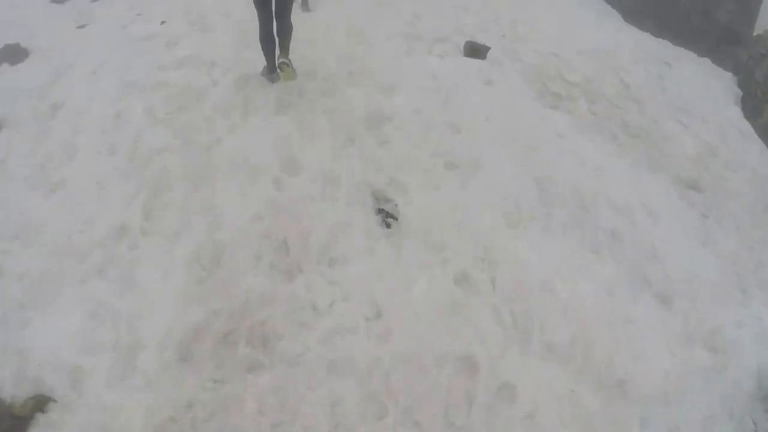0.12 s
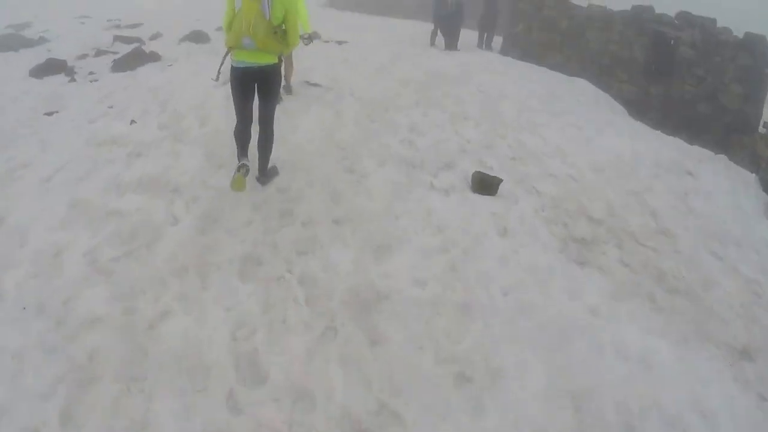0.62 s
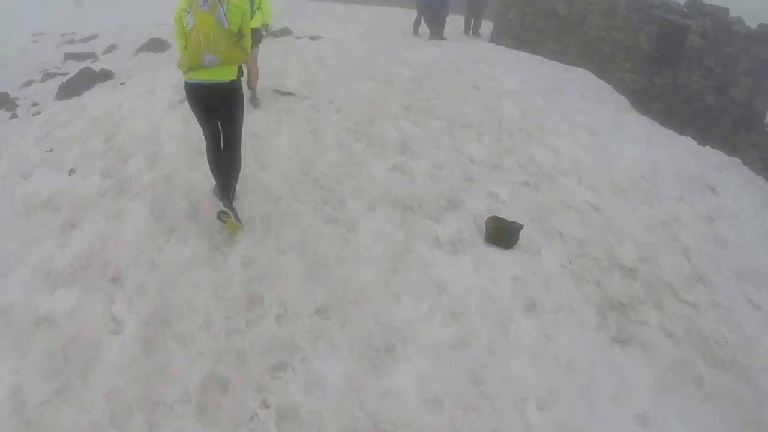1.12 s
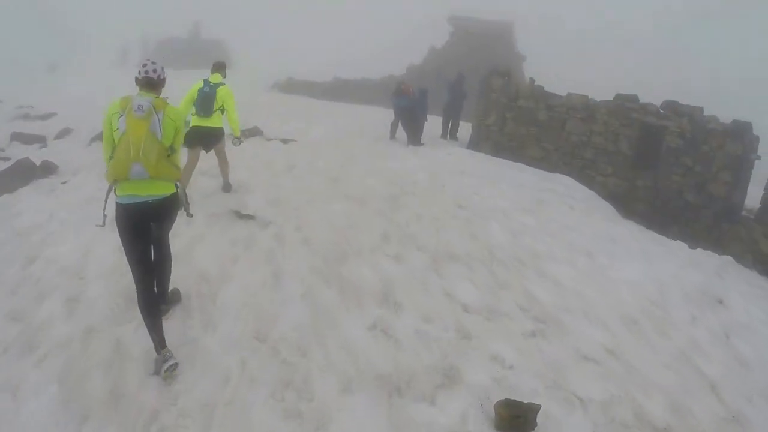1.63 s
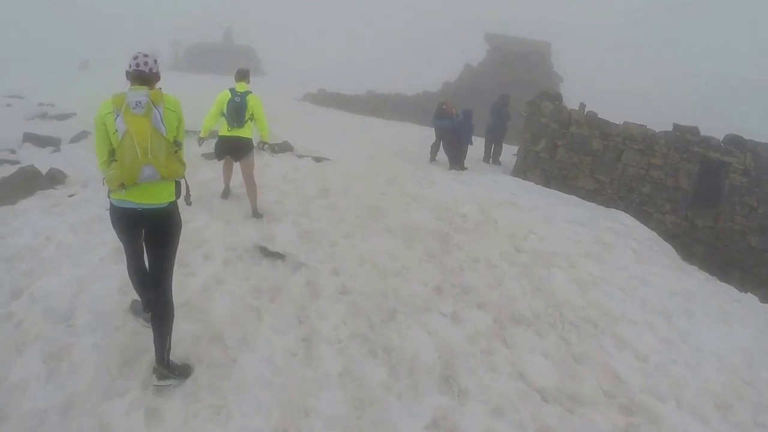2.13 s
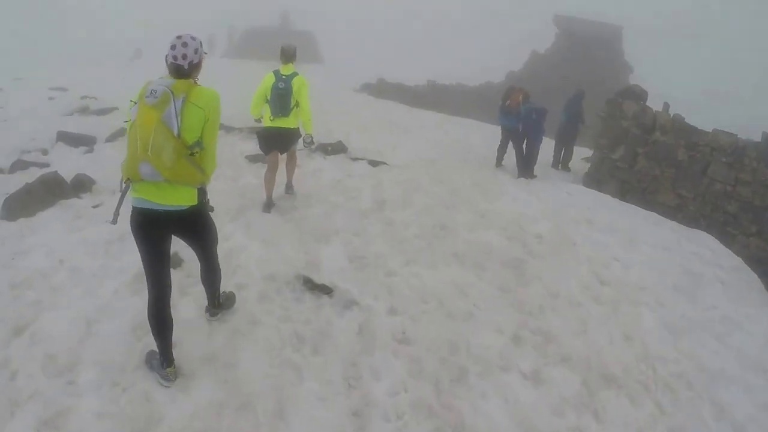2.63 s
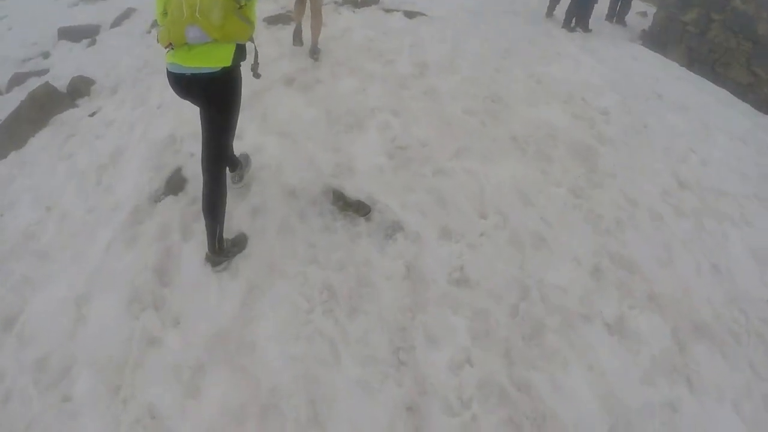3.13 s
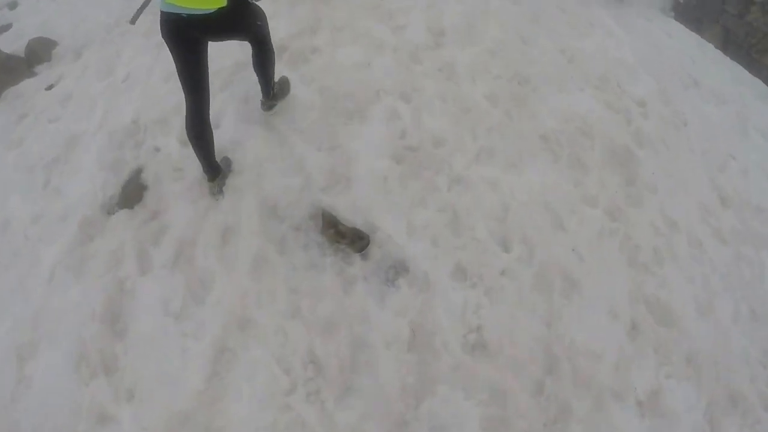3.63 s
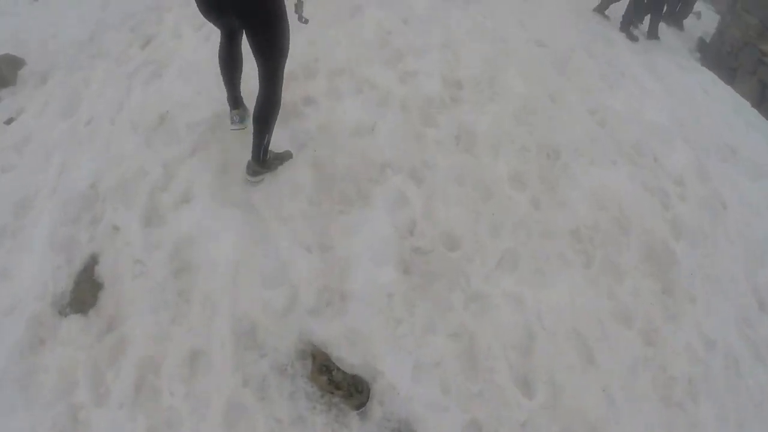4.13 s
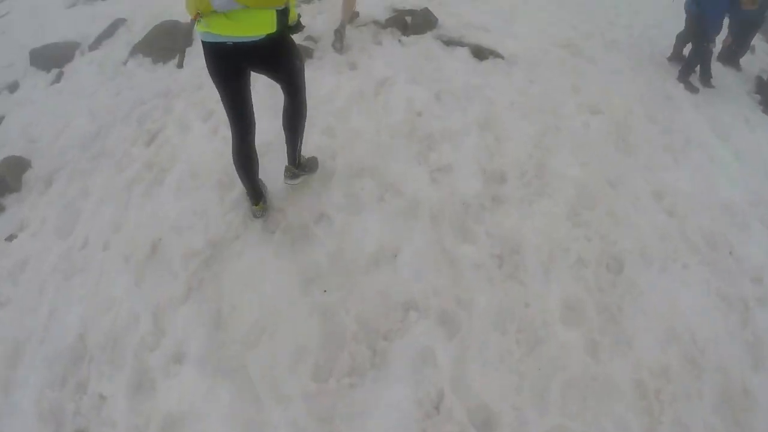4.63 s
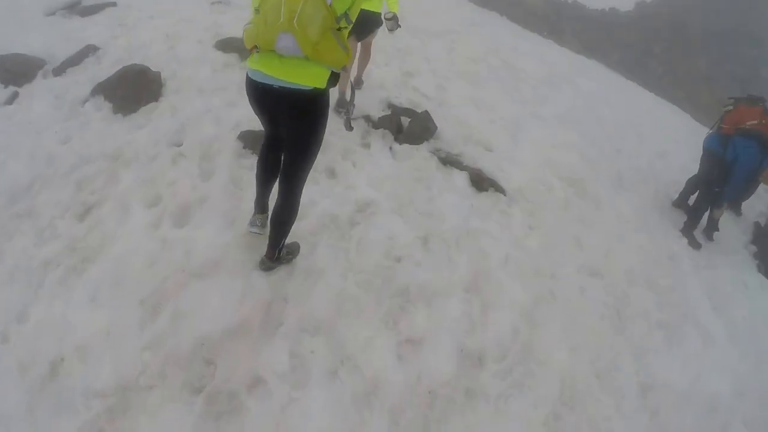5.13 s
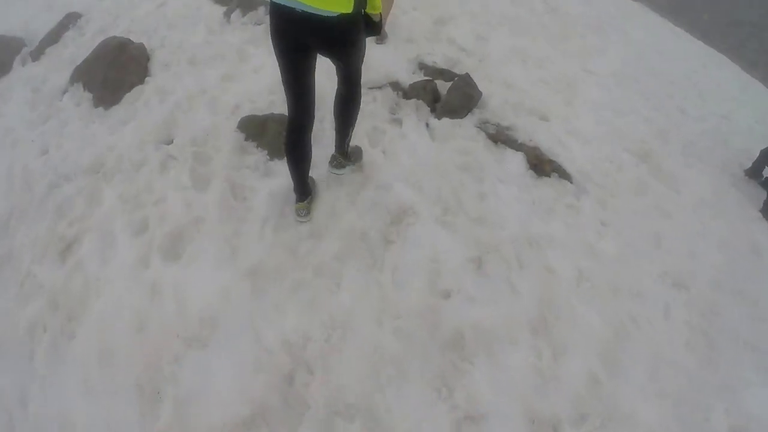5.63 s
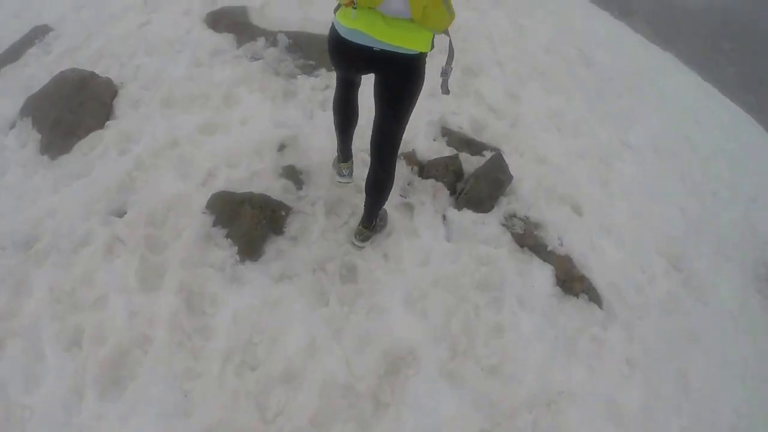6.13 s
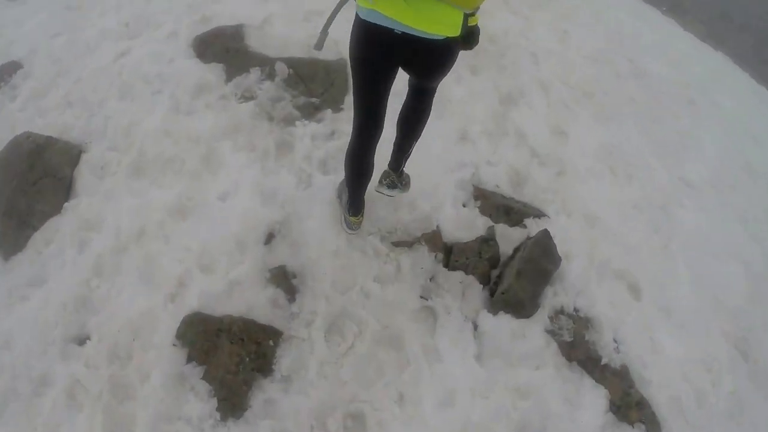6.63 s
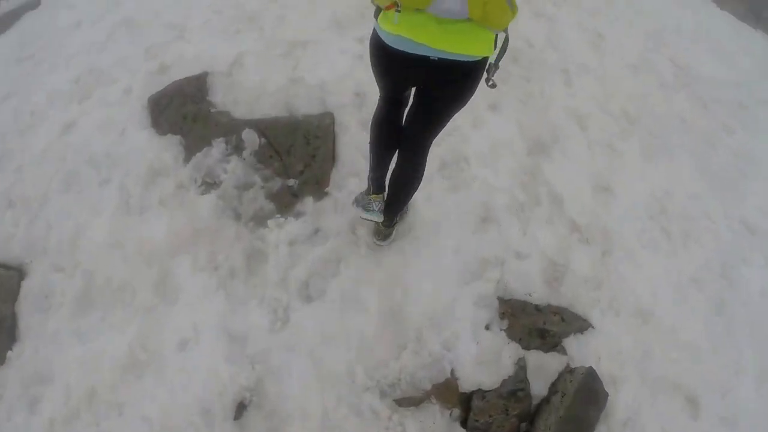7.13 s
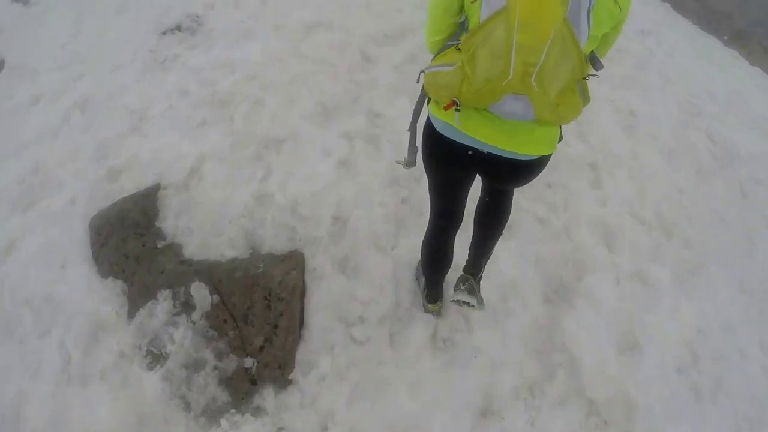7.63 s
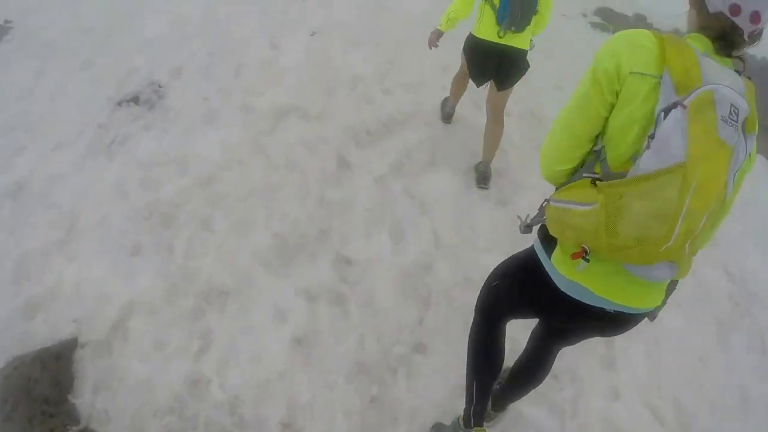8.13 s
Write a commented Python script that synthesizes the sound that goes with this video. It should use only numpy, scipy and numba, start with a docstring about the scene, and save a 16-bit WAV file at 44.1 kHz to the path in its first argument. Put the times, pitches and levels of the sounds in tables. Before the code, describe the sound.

Steady footsteps pack wet snow, each jolting the camera mount with a low thump, while straps and buckles click above constant soft hiss.

```python
"""Deep dull thuds and muffled crunches: a walker climbs a wet snowfield with a small camera on the body.
Each footfall shakes the mount, made as low noise pushed by jolts, and packs the snow, made as a
dense stream of tiny grains. Sharp ticks come from buckles, straps and cracking snow crust; a zip pull
chinks, a sole scuffs and air murmurs. The closed housing's cavities, made as resonances, color the
crunch and ticks, over steady hiss."""
import sys
import numpy as np
from scipy import signal
from scipy.fft import rfft, irfft, next_fast_len
from scipy.io import wavfile
from scipy.ndimage import uniform_filter1d
from numba import njit

SR = 44100
rng = np.random.default_rng(int(sys.argv[2]) if len(sys.argv) > 2 else 0)


def linear_from_db(decibels):
    """Turn decibels (scalar or array-like) into linear amplitude factors; 0 gives 1."""
    return 10 ** (np.asarray(decibels, float) / 20)


def master_out(mix):
    """Clip the mix to full scale and print it as 16-bit PCM to the path in sys.argv[1]."""
    frames = np.transpose(np.atleast_2d(mix))
    ceiling = np.clip(frames, -1, 1)
    pcm = np.round(ceiling * 32767).astype(np.int16)
    wavfile.write(sys.argv[1], SR, pcm)


N = 364266
T = np.arange(N) / SR  # time of every sample, in seconds

# Cavities of the housing, lower and higher ones; the lower ones color the coarse grains, the higher the fine.
# Each row: pitch in Hz, nominal width in Hz, relative level in dB.
COARSE_CAVITIES = [(1607, 490, 7), (2334, 760, 9.5), (2700, 850, 5), (3480, 790, 3)]
FINE_CAVITIES = [(4543, 890, 5.5), (5666, 680, 2), (6600, 1830, -2), (8900, 4100, -12), (10680, 2460, -8.5),
                 (13060, 1470, -11), (14850, 390, -15)]


def level(x, db):
    """Scale a sound to an rms level in dB."""
    return x * linear_from_db(db) / np.sqrt(np.mean(x ** 2))


def walk(rate):
    """Random levels, spread near 1: a new one every 1 / rate seconds, joined by straight slopes."""
    hold = int(SR / rate)
    steps = np.repeat(rng.standard_normal(N // hold + 1), hold)
    return 0.92 * uniform_filter1d(steps, hold)[:N]


def ring(x, modes, flutter_db=0):
    """Add up steep resonances with alternating sign; each may flutter in level on its own."""
    out = 0
    for k, (hz, width, db) in enumerate(modes):
        b, a = signal.iirpeak(hz, hz / (0.85 * width), fs=SR)
        gain = linear_from_db(db + flutter_db * walk(40)) if flutter_db else linear_from_db(db)
        once = signal.lfilter(b, a, x)
        twice = signal.lfilter(b, a, once)  # the second pass makes the slopes steep
        out = out + (-1) ** k * gain * twice
    return out


@njit
def follow(x, rise_s, fall_s):
    """Slew a level with one time for rising and another for falling."""
    y, now = np.empty(len(x)), x[0]
    for i in range(len(x)):
        now += (x[i] - now) / (SR * (rise_s if x[i] > now else fall_s))
        y[i] = now
    return y


def grains():
    """Dense crystal fractures of uneven size, over the rush of the many too small to tell apart."""
    grains_per_s, mean_boost_db = 3500, 2.5
    breaks = (rng.random(N) < grains_per_s / SR) * rng.choice([-1., 1.], N)
    sizes = linear_from_db(mean_boost_db * rng.exponential(size=N))
    rush = 1.13 * rng.standard_normal(N)
    return level(breaks * sizes, 0) + rush


def hiss():
    """Steady microphone noise and far air: random noise shaped by a fixed curve over pitch."""
    # The color of the hiss. Each row: pitch in Hz, relative level in dB per Hz.
    color = [(53, -35), (90, -15), (135, -6), (1210, -15), (1600, -13.5), (1940, -16.5), (2360, -14.5),
             (3190, -22), (4590, -29.5), (5010, -24), (5690, -27.5), (8380, -33), (10600, -34),
             (14300, -38), (15300, -46)]
    size = next_fast_len(N)
    hz, db = np.transpose(color)
    bin_hz = np.arange(size // 2 + 1) * SR / size
    gain = linear_from_db(np.interp(np.log(bin_hz + 1), np.log(hz), db))
    noise = irfft(rfft(rng.standard_normal(size)) * gain, size)[:N]
    return level(noise, -60.5)


def wind():
    """Light air and cloth brush the housing: a low, uneven murmur of noise in two low resonances."""
    # How strong the murmur is over time. Each row: time in seconds, level in dB.
    strength = [(0.0, -68), (1.72, -70), (2.0, -53.5), (2.71, -69.5), (2.76, -61.5), (7.98, -73.5),
                (8.07, -54), (8.26, -88)]
    s, db = np.transpose(strength)
    air = ring(rng.standard_normal(N), [(92, 39, 2.5), (161.0, 210, -7.0)])
    uneven = air * linear_from_db(5.1 * walk(11))
    return level(uneven, 0) * linear_from_db(np.interp(T, s, db))


def scuffs():
    """Short drags of a sole close by, lower and fuller than the crunch: grains that swell and fade."""
    # The drags. Each row: middle in seconds, length in seconds, peak level in dB.
    drags = [(2.226, 0.098, -41.5), (2.35, 0.13, -52.5), (2.82, 0.044, -60)]
    # The color of a drag. Each row: pitch in Hz, nominal width in Hz, relative level in dB.
    color = [(223, 220, -5), (390, 380, -3.5), (846, 430, -9.5), (1720, 490, 3), (2200, 130, 5.5),
             (2920, 390, -6)]
    swell = sum(linear_from_db(db) * np.exp(-2 * ((T - s) / (length / 2)) ** 2) for s, length, db in drags)
    return swell * level(ring(grains(), color), 0)


def chink():
    """A small metal zip pull is struck once and rings briefly: a few pure tones that die away."""
    # The tones. Each row: pitch in Hz, level in dB before the soft start and fade, time to fade 60 dB in seconds.
    tones = [(1760, -37.5, 0.049), (2460, -45, 0.032), (3750, -55, .06), (5400, -47, .015),
             (6600, -41, 0.012)]
    t = np.maximum(T - 2.031, 0)  # seconds since the strike
    soft_start = 1 - np.exp(-t / 0.00074)
    return sum(linear_from_db(db - 60 * t / t60) * np.sin(2 * np.pi * hz * t) * soft_start for hz, db, t60 in tones)


def ticks():
    """A sharp touch with a short burst of rattle and a faint tail of some milliseconds:
    three short rings of its own together with the housing's."""
    # Sharp ticks: buckles and straps, and at 5.569, 6.143 and 7.554 the snow crust cracking under the sole.
    # Each row: start in seconds, peak level in dB, low ring in Hz,
    # brightness in dB (how much of the high ring and fine cavities is mixed in).
    touches = [(0.1949, -22, 2130, -27.5), (0.2361, -39.5, 2410, -23), (0.3885, -43.5, 2320, -30),
               (0.4625, -38, 2670, -18), (0.5122, -17.5, 4100, -10.5), (1.2257, -39, 2020, -37),
               (1.6367, -43, 2200, -30), (1.8205, -33.5, 1600, -22), (2.3159, -26, 3050, -19),
               (2.6997, -41.5, 1600, -7), (2.7232, -34.5, 1680, -12.5), (3.0724, -42, 2560, -26),
               (3.107, -32, 2330, -22.5), (3.1916, -33, 1610, -25), (3.371, -43, 2250, -23),
               (3.459, -38, 2250, -28), (3.5099, -40, 2510, -14), (3.595, -47.5, 2550, -26),
               (3.7544, -23, 2280, -30.5), (4.2191, -41, 1690, -11), (4.586, -28, 2400, -25),
               (5.569, -41, 2300, -22), (6.143, -35, 2300, -23), (7.554, -31, 2420, -21)]
    high_hz, air_hz, contact_ms = 5510, 12800, .65
    out, size = np.zeros(N), int(.04 * SR)
    t_ms = np.arange(size) * 1000 / SR
    contact = np.exp(-(t_ms / contact_ms) ** 2)
    tail = 0.072 * np.exp(-t_ms / 4.4)
    rattles = rng.standard_normal((len(touches), size))
    for (s, db, low_hz, bright_db), rattle in zip(touches, rattles):
        tap = (t_ms == 0) + 0.12 * rattle * (contact + tail)
        own_rings = [[(low_hz, 750, 0)], [(high_hz, 1500, 0)], [(air_hz, 4500, 0)]]
        rings = [ring(tap, modes) for modes in own_rings + [COARSE_CAVITIES, FINE_CAVITIES]]
        low, high, air, coarse, fine = (r / np.abs(r).max() for r in rings)
        bright = linear_from_db(bright_db) * (5.2 * high + 2.9 * fine)
        one = low + linear_from_db(-33) * air + 0.68 * coarse + bright
        i = int(s * SR)
        out[i:i + size] += linear_from_db(db) * one / np.abs(one).max()
    return out


def crunch():
    """Touch, press, settle: the loudest press leads; every pitch of grain comes and goes alone."""
    # A shoe presses the snow and holds. Each row: start in seconds, length in seconds,
    # target level in dB, fine grains against coarse in dB.
    presses = [(0, 0.065, -60, -7), (0.123, 0.066, -52, -4), (0.331, 0.02, -55.5, -3),
               (.427, .068, -58.5, -5), (0.492, 0.063, -50.5, -7), (0.892, 0.13, -55.5, -6),
               (1.021, 0.15, -55.5, -12), (1.267, 0.092, -57.5, -6.5), (1.354, 0.063, -50, -4.5),
               (1.652, .1, -55, -6), (1.766, .135, -55.5, -5), (2.082, .1, -60.5, -1.5),
               (2.192, 0.062, -50, -9.5), (2.26, 0.056, -53.5, -4), (2.32, .06, -56.5, -10),
               (2.722, 0.089, -60.5, -2.5), (2.784, 0.057, -51.5, -4.5), (3.21, .032, -57, -3),
               (3.243, 0.065, -52, -2.8), (3.415, 0.11, -62.5, -6), (3.74, 0.055, -61, -2),
               (3.823, 0.079, -51.5, -5), (4.04, 0.1, -62, -3.5), (4.316, 0.068, -58.5, -11),
               (4.37, .055, -49.5, -7.5), (4.43, 0.1, -58.5, -4), (4.705, 0.077, -61.5, -4.5),
               (4.853, 0.12, -61, -1), (5.08, 0.076, -51.5, -2), (5.33, .048, -60.4, -6),
               (5.41, 0.033, -57.5, -6), (5.563, 0.039, -53, -4), (5.607, 0.093, -59, -3),
               (5.744, .02, -64, 5), (5.809, .05, -55, -3.5), (5.842, .1, -55.5, -4), (6.095, 0.02, -59, 3),
               (6.131, 0.11, -55, -2.5), (6.308, 0.055, -60, -5.5), (6.413, 0.02, -55, -7),
               (6.613, 0.036, -55.5, -15), (6.64, 0.13, -59, -3), (6.899, .08, -55.5, -4),
               (6.978, 0.086, -59, -7), (7.123, 0.13, -54.5, -4.5), (7.393, 0.072, -56.5, -5.5),
               (7.541, .026, -50.5, -4.5), (7.57, 0.075, -55.5, -4.5), (7.675, 0.12, -58, -12),
               (8.022, 0.065, -52.5, -5), (8.196, 0.027, -56.5, -7)]
    touch_db, touch_db_per_s = -10, 118  # the sole touches down just before the press
    settle_db, settle_db_per_s = -9.5, 34  # the snow settles after it: step down, then fade
    # rustle of walkers further off lies under everything
    coarse_db = -66 + 1.5 * walk(11)
    fine_db = coarse_db - 5
    for s, length, press_db, tilt_db in presses:
        touch = touch_db - touch_db_per_s * (s - T)
        settle = settle_db - settle_db_per_s * (T - s - length)
        shape = np.where(T < s, touch, np.where(T < s + length, 0, settle))
        coarse_db = np.maximum(coarse_db, press_db + shape)
        fine_db = np.maximum(fine_db, press_db + tilt_db + shape)
    # the crust breaks at once; loose grains trickle on after the load eases
    coarse_db = follow(coarse_db, 0.0062, 0.014)
    fine_db = follow(fine_db, 0.0062, 0.014)
    snow = grains() * linear_from_db(1.9 * walk(30) + 1.8 * walk(110))
    coarse = level(ring(snow, COARSE_CAVITIES, flutter_db=3.0), 0)
    fine = level(ring(snow, FINE_CAVITIES, flutter_db=2.5), 0)
    return linear_from_db(coarse_db) * coarse + linear_from_db(fine_db) * fine


def thuds():
    """The mount sways and knocks on its straps, pushed unevenly; each jolt builds up and dies away."""
    # Jolts of the body that reach the mount, two or three to a footfall. Each row: peak time in seconds,
    # push on the slow sway in dB, push on the quicker knock in dB (both before the padding).
    jolts = [(.084, -43, -36.5), (.148, -38, -58), (.243, -40, -34), (0.365, -30, -26.5), (.44, -37, -64),
             (0.578, -27, -53), (.623, -64, -37.5), (.81, -44, -43.5), (0.968, -24.5, -35),
             (1.353, -33.5, -56), (1.447, -33, -24), (1.82, -30, -33.5), (1.884, -51, -25),
             (1.987, -43, -63), (2.237, -33.5, -42.5), (2.359, -28.5, -56), (2.738, -40, -61),
             (2.83, -35.5, -28), (2.889, -30, -36), (3.283, -33, -22.5), (3.336, -23, -39),
             (3.396, -44, -35), (3.835, -32, -34), (3.899, -37, -27.5), (3.97, -32, -53),
             (4.03, -35.5, -55), (4.444, -26, -21), (4.56, -34, -45), (4.633, -40.5, -46), (4.77, -42, -47),
             (4.99, -44, -39), (5.118, -26.5, -17.5), (5.16, -26, -29), (5.204, -36, -29.5),
             (5.595, -37.5, -37.5), (5.694, -26.5, -49), (5.834, -41.5, -38), (6.164, -27.5, -27.5),
             (6.265, -24.5, -26.5), (6.685, -30, -32.5), (6.801, -39, -33), (7.154, -22.5, -28),
             (7.245, -29, -32.5), (7.598, -27.5, -21.5), (7.675, -48, -37), (7.726, -37.5, -51),
             (7.918, -44.5, -38), (8.01, -28.5, -46), (8.112, -19, -13.5), (8.2, -54, -50)]
    # Sway, then knock. Each row: build-up in dB per second, dying away in dB per second,
    # level between jolts in dB (before the padding).
    jolt_shape = [(460, 181, -51.5), (636, 287, -53.5)]
    # Sway, then knock. Each row: lower and upper edge of its band in Hz.
    shake_hz = [(10, 32.9), (34, 61)]
    out = 0
    s, *peaks_db = np.transpose(jolts)
    for peak_db, edges_hz, (up, down, rest_db) in zip(peaks_db, shake_hz, jolt_shape):
        push = linear_from_db(rest_db)
        for at, db in zip(s, peak_db):
            push = push + linear_from_db(db - np.maximum(up * (at - T), down * (T - at)))
        band = signal.butter(2, edges_hz, "bandpass", fs=SR, output="sos")
        swing = signal.sosfilt(band, rng.standard_normal(N))
        swing = signal.hilbert(swing, next_fast_len(N))[:N]  # its size gives the momentary strength
        # the push lasts through the step, so the swing stays fairly even
        even = swing.real / np.abs(swing) ** 0.52
        out = out + level(even * linear_from_db(2.15 * walk(14)), 0) * push
    # soft straps and clothing hold back what is quick; a faint share gets past them
    padding = signal.butter(3, 70.7, fs=SR, output="sos")
    return signal.sosfiltfilt(padding, out) + linear_from_db(-21.5) * out


def scene():
    """Everything reaches one microphone, so the sounds simply add up."""
    mix = thuds() + wind() + crunch() + ticks() + chink() + scuffs() + hiss()
    return mix[None]  # one channel


def low_pass(x):
    """Removes everything above the highest recorded frequency."""
    return signal.sosfilt(signal.butter(12, 16480, fs=SR, output="sos"), x)


def record(dry):
    """The camera takes in the finished mix; its treble ends at about 16.5 kHz."""
    return low_pass(dry)


dry = scene()
out = record(dry)
master_out(out)
```